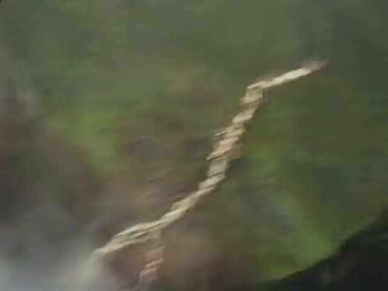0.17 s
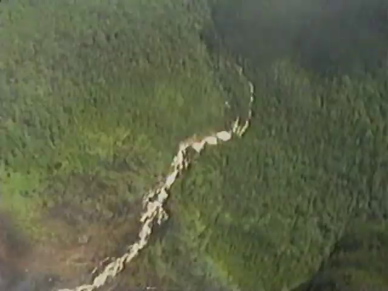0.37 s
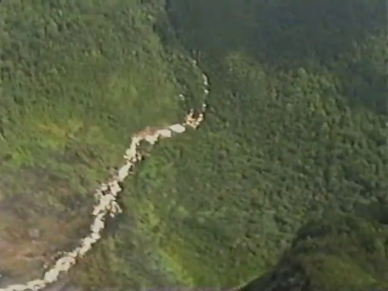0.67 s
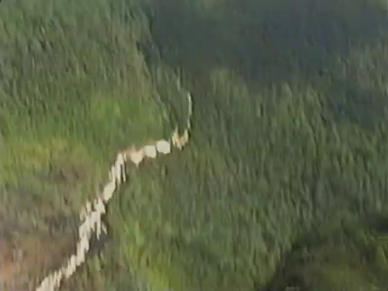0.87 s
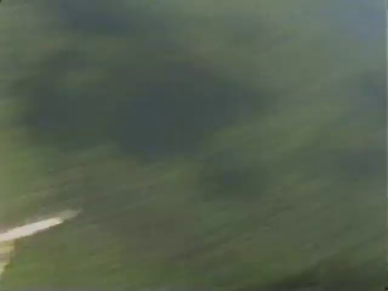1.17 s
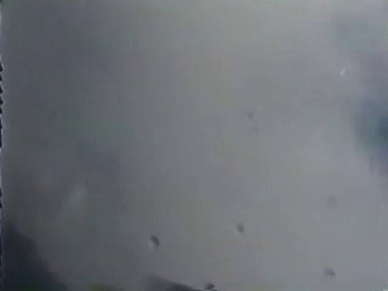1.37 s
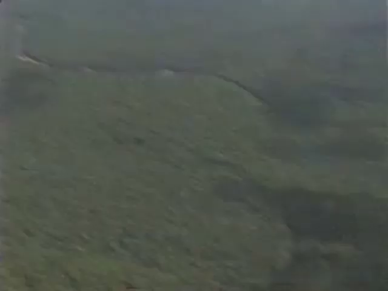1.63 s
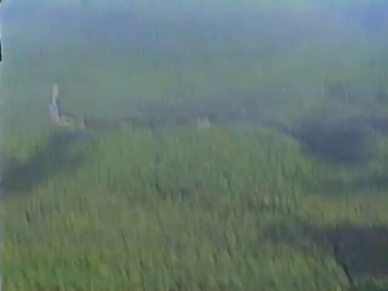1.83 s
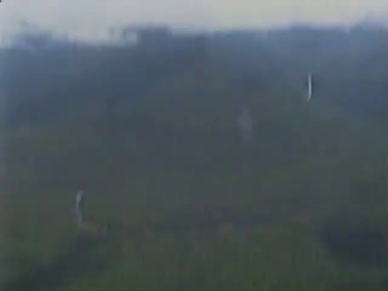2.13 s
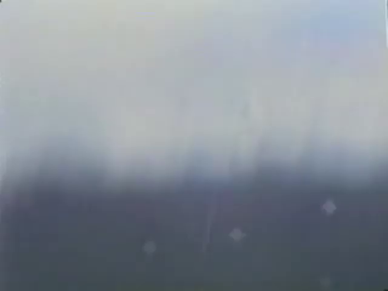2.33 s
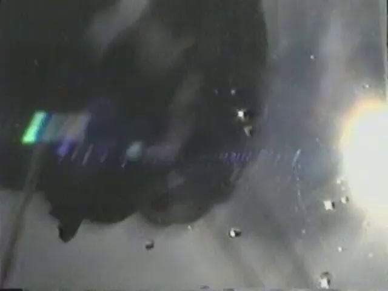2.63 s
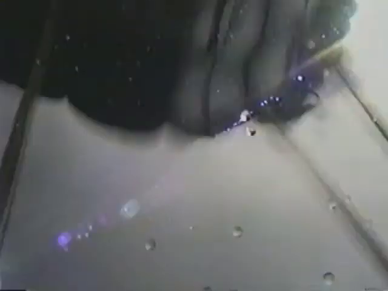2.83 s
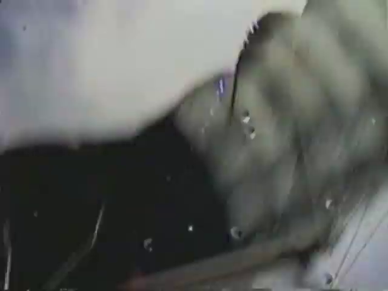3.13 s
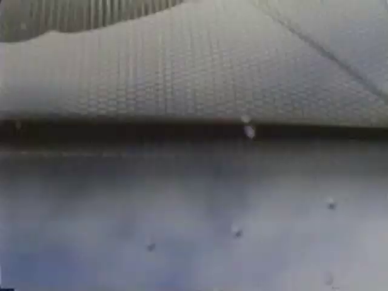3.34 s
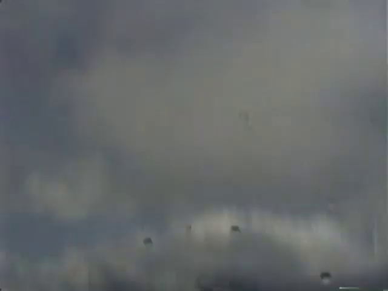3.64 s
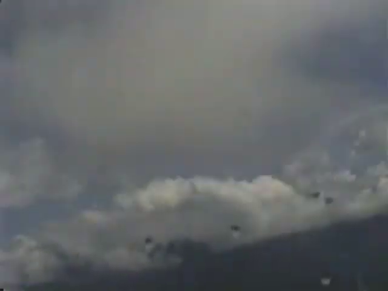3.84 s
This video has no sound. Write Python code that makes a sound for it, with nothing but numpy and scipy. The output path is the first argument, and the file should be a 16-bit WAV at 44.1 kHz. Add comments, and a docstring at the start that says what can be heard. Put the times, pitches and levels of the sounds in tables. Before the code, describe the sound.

Strong wind tears at a small camera microphone, cuts out briefly, then fades to fabric rustles.

```python
"""Wind in free fall, then under a canopy

Strong wind tears past the two capsules of a small camera microphone, then dies down under an opening canopy.
It is banded noise that follows drawn levels; an opposed push overloads each capsule, and the mono fold cancels
the overloads to flat stretches with spikes between. A short rising swish is a gliding tone. Later, low swings
thump the housing, bursts of crackle make fabric rustle and damped rings make cloth and straps snap.
A coarse converter leaves quiet parts grainy, and the sound drops out for a moment."""
import sys
import numpy as np
from scipy import signal
from scipy.fft import rfft, irfft
from scipy.io import wavfile

SR = 44100
rng = np.random.default_rng(int(sys.argv[2]) if len(sys.argv) > 2 else 0)


def generate_wav(sig):
    """Save sig (samples, or channels by samples) to the path in sys.argv[1] as 16-bit PCM at SR."""
    pcm = np.round(np.clip(np.atleast_2d(sig).T, -1, 1) * 32767).astype(np.int16)
    wavfile.write(sys.argv[1], SR, pcm)


N = 176400
CUTOFF_HZ = 15700  # top of the rustles' sheen and of the finished sound


def from_db(db):
    """Turn decibels into an amplitude factor."""
    return 10 ** (np.asarray(db) / 20)


def rms_one(x):
    """Scale a signal to an RMS of 1."""
    return x / np.sqrt(np.mean(x ** 2) + 1e-20)


def band(x, low_hz, high_hz, order=2):
    """Butterworth band-pass."""
    edges_hz = [low_hz, min(high_hz, .45 * SR)]
    return signal.sosfilt(signal.butter(order, edges_hz, "band", fs=SR, output="sos"), x)


def drift(rate_hz):
    """Random wander of RMS 1: white noise through two equal one-pole low-passes."""
    pole = np.exp(-2 * np.pi * rate_hz / SR)
    noise = rng.standard_normal(N + SR)
    wander = signal.lfilter([1], [1, -2 * pole, pole * pole], noise)
    return rms_one(wander[SR:])  # skip the filter's start


def coloured(spectrum):
    """Noise shaped to a spectrum, interpolated along log frequency."""
    hz, db = np.transpose(spectrum)
    bins_hz = np.arange(N // 2 + 1) * SR / N
    gain = from_db(np.interp(np.log(bins_hz + 1), np.log(hz), db))
    return irfft(rfft(rng.standard_normal(N)) * gain, N)


def in_time(rows):
    """Draw straight lines through each column, against the start times in the first."""
    start_s, *columns = np.transpose(rows)
    return [np.interp(np.arange(N) / SR, start_s, column) for column in columns]


def thumps():
    """Air thumps the housing: each thump is a few low, unsteady swings that swell and fade."""
    # low thumps: start_s [s], level_db [dB], pitch_hz [Hz], length [cycles]
    thump_list = [(2.598,-10.5,61.7,2.6), (2.642,-9.5,80,1.8), (3.187,-20,43.3,3.6), (3.267,-24,140,4.3)]
    out, t = np.zeros(N), np.arange(N) / SR
    for start_s, level_db, pitch_hz, cycles in thump_list:
        turns = np.clip((t - start_s) * pitch_hz, 0, cycles)
        swell = np.sqrt(np.abs(np.sin(np.pi * turns / cycles)))
        wobble_rad = drift(2 * pitch_hz) / 2
        out += from_db(level_db) * swell * np.sin(2 * np.pi * turns + wobble_rad)
    return out


def snaps():
    """Cloth and straps snap: a heavily damped ring with a puff of noise that decays five times slower."""
    # dull snaps: start_s [s], level_db [dB], centre_hz [Hz]
    snap_list = [(2.516,-11,455), (3.047,-18.5,1470), (3.085,-15.5,590), (3.618,-22,1150),
                 (3.759,-23.5,1170)]
    ring_cycles = 5.9  # cycles for the ring to fall by 60 dB
    out, t = np.zeros(N + SR), np.arange(SR // 10) / SR
    for start_s, level_db, centre_hz in snap_list:
        puff = rms_one(band(rng.standard_normal(len(t)), centre_hz / 2, centre_hz * 2))
        decay_db = -60 * t * centre_hz / ring_cycles
        ring = from_db(decay_db) * np.sin(2 * np.pi * centre_hz * t)
        attack = np.minimum(1, 5 * centre_hz * t)  # a fifth of a cycle
        snap = (0.15 * from_db(decay_db / 5) * puff - ring) * attack
        out[int(start_s * SR):][:len(t)] += from_db(level_db) * snap
    return out[:N]


def rustles():
    """Fabric rustles: a short swell of dense random crackles, in a band just under an octave plus a thin sheen."""
    # rustles: start_s [s], level_db [dB], centre_hz [Hz], rise_s [s]
    rustle_list = [(2.16,-44.5,3870,0.047), (2.468,-42,5880,0.006), (2.506,-37.5,7260,0.0049),
                   (2.702,-42,6400,0.0025), (2.786,-49,5960,0.0017), (2.845,-40,4730,0.0092),
                   (2.903,-41,4000,0.0067), (3.015,-39,4000,0.0053), (3.384,-49,5100,0.004),
                   (3.573,-44,7700,0.015), (3.684,-49,7200,0.023), (3.792,-45,9100,.002),
                   (3.806,-46,6040,0.0026), (3.836,-38,8060,0.0014), (3.847,-40,7400,0.0012),
                   (3.894,-44.5,8040,0.0082), (3.926,-45,7000,.003), (3.938,-42.5,9100,0.0064),
                   (3.961,-43,7600,0.0036), (3.973,-46,8100,.003)]
    crackles_per_s, crackle_spread_db = 4900, 7
    sheen_hz, sheen_db = 9200, -10.5  # lower edge; level relative to the rustle's body
    out, t = np.zeros(N + SR), np.arange(SR // 4) / SR
    for start_s, level_db, centre_hz, rise_s in rustle_list:
        chance, side, size = rng.random((3, len(t)))
        heights = from_db(-crackle_spread_db * np.log(size + 0.012))  # a few stand far above the rest
        crackle = (chance < crackles_per_s / SR) * np.sign(side - .5) * heights
        swell = t / rise_s * np.exp(1 - t / rise_s)
        swell = swell * np.exp(-(t / (4.0 * rise_s)) ** 4)  # cuts the tail short
        body = rms_one(band(crackle, centre_hz / 1.4, centre_hz * 1.3))
        sheen = from_db(sheen_db) * rms_one(band(crackle, sheen_hz, CUTOFF_HZ))
        out[int(start_s * SR):][:len(t)] += from_db(level_db) * swell * (body + sheen)
    return out[:N]


def swish():
    """A wavering, breathy tone glides upward, fastest at first, under a single swell."""
    start_s, end_s = 1.154, 1.192
    start_hz, end_hz = 1790, 3600
    level_db, waver_hz = -30.5, 200
    way = np.clip((np.arange(N) / SR - start_s) / (end_s - start_s), 0, 1)
    pitch_hz = start_hz + (end_hz - start_hz) * np.sqrt(way)
    tone = np.sin(2 * np.pi * np.cumsum(pitch_hz) / SR)
    swell = np.sqrt(np.abs(np.sin(np.pi * way)))
    return from_db(level_db) * swell * (1 + drift(waver_hz)) * tone


def opposed_wind():
    """Wind that pushes the capsules in opposite directions: low rumble and higher rush, each noise in a band."""
    # push levels: start_s [s], rumble_db [dB], rush_db [dB]
    push_levels = [(0, -11, -4), (.12, -8, -7), (.27, -5, -14), (.34, -12, -14), (1.14, -12, -14),
                   (1.22, -10, 0), (1.52, -9, 1), (1.585, -13, -7), (1.62, -7, -14), (1.97, -8, -11),
                   (2.11, -11, -14), (2.5, -12, -19), (2.57, -5, -16), (2.66, -10, -18), (2.72, -22, -26)]
    rumble = rms_one(band(rng.standard_normal(N), 25, 160))
    rush = rms_one(band(rng.standard_normal(N), 130, 620))
    rumble_db, rush_db = in_time(push_levels)
    return from_db(rumble_db) * rumble + from_db(rush_db) * rush


def alike_wind():
    """Turbulence heard alike on both capsules: five bands of noise, each with its own level and flutter."""
    # edges of the five bands, low to high: edge_hz [Hz]
    edges_hz = [15, 150, 500, 1200, 2400, 15000]
    # colour of the turbulence within the bands: frequency_hz [Hz], density_db [dB per Hz, relative]
    colour = [(15, -8.5), (45, -2.5), (130, -5.5), (300, -9), (500, -14), (1200, -25.5), (2200, -36),
              (3500, -38), (8600, -41), (15000, -58.5)]
    # band levels: start_s [s], bass_db, low_mids_db, mids_db, upper_mids_db, treble_db [all dB]
    band_levels = [(0,-17.5,-16.5,-13,-24,-37), (.1,-19,-17.5,-19.5,-39.5,-40),
                   (0.231,-20,-12.5,-42.5,-54,-48), (.32,-20.5,-20,-38,-55,-51.5),
                   (.55,-22.5,-18.5,-34.5,-35.5,-42.5), (1.057,-21,-19,-39.5,-43,-45.5),
                   (1.108,-28,-27,-34,-43.5,-48), (1.169,-17.5,-19.5,-28.5,-31,-34),
                   (1.21,-22,-22.5,-19.5,-40,-36), (1.3,-15,-15.5,-16,-34,-34.5),
                   (1.46,-13.5,-15.5,-11,-18.5,-39), (1.59,-23,-18.5,-25.5,-43,-35),
                   (1.605,-15,-16.5,-32,-49,-47.5), (1.751,-15.5,-18,-23,-33.5,-41),
                   (1.85,-13,-18.5,-31.5,-38,-40.5), (1.97,-15.5,-13.5,-34,-42.5,-41),
                   (2.11,-24.5,-21.5,-29,-35,-43.5), (2.237,-19,-19,-34,-30,-42),
                   (2.33,-14.5,-25,-31,-38,-45), (2.39,-21,-29.5,-37,-47.5,-49),
                   (2.48,-18.5,-30.5,-47,-37.5,-49), (2.601,-19,-16.5,-38,-45,-47.5),
                   (2.688,-19.5,-35,-41,-45.5,-48), (2.83,-28,-33,-36,-34.5,-45.5),
                   (2.93,-29,-34,-41,-38.5,-49.5), (3.0,-34.5,-38,-37.5,-39.5,-44.5),
                   (3.104,-38,-33,-40,-36.5,-44), (3.152,-39.5,-44.5,-48.5,-51.5,-53.5),
                   (3.27,-33,-38,-52,-56,-59.5), (3.328,-34,-46,-53.5,-59,-58),
                   (3.37,-34.5,-43,-51,-47.5,-53), (3.6,-42,-51,-49.5,-51.5,-58.5),
                   (3.8,-43.5,-47,-50.5,-50.5,-59), (4,-43.5,-54,-55.5,-58,-56)]
    flutter_db, flutter_hz = 1.5, 29
    out = np.zeros(N)
    for low_hz, high_hz, level_db in zip(edges_hz, edges_hz[1:], in_time(band_levels)):
        flutter = from_db(flutter_db * drift(flutter_hz))
        turbulence = band(coloured(colour), low_hz, high_hz, order=3)
        out += from_db(level_db) * rms_one(flutter * turbulence)
    return out


def overload(x):
    """The preamplifier flattens out at its limit with a slightly rounded knee."""
    limit, knee = .42, 4  # limit in full scale; a higher knee is sharper
    return x / (1 + np.abs(x / limit) ** knee) ** (1 / knee)


def scene():
    """Both capsules overload on their own and are folded to one channel."""
    mismatch_db = .4  # one channel is slightly louder
    opposed = opposed_wind()
    alike = thumps() + snaps() + rustles() + swish() + alike_wind()
    first = overload(alike + opposed) * from_db(mismatch_db)
    second = overload(alike - opposed)
    return (first + second)[None] / 2


def record(dry):
    """Coupling capacitor, dull tape top, coarse converter steps with a dropout, smoothing and a steep cut."""
    coupling_hz, tape_top_hz, smooth_hz = 5, 13600, 11020
    step = .00545  # converter step in full scale
    dropout_start_s, dropout_end_s = 1.9815, 2.0955
    out = signal.sosfilt(signal.butter(1, [coupling_hz, tape_top_hz], "band", fs=SR, output="sos"), dry)
    t = np.arange(N) / SR
    held = np.where(t < 2.025, 2, 1)  # the dropout rests on step two, then on step one
    silent = (t > dropout_start_s) & (t < dropout_end_s)
    steps = np.where(silent, held, np.floor(out / step))
    out = signal.sosfilt(signal.butter(3, smooth_hz, fs=SR, output="sos"), step * steps)
    return signal.sosfilt(signal.cheby2(12, 70, CUTOFF_HZ, fs=SR, output="sos"), out)


dry = scene()
out = record(dry)
generate_wav(out)
```